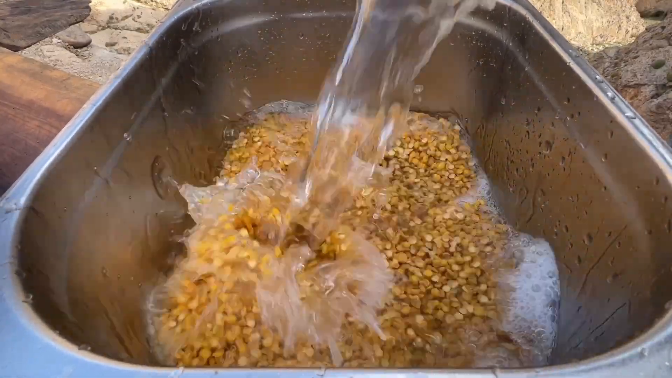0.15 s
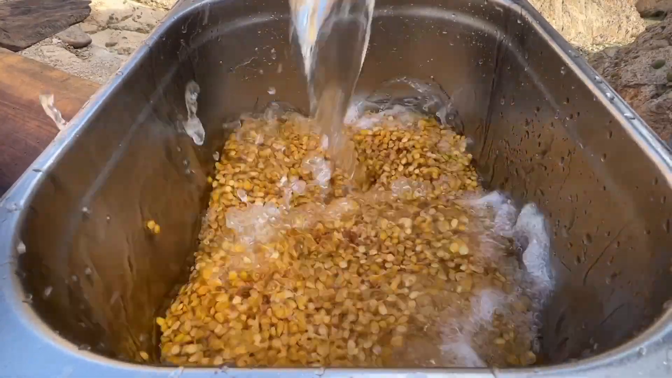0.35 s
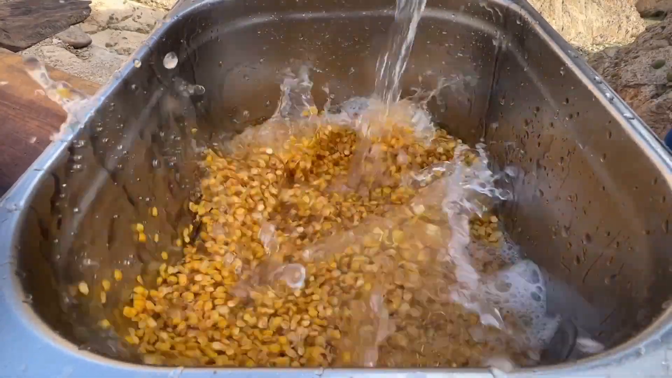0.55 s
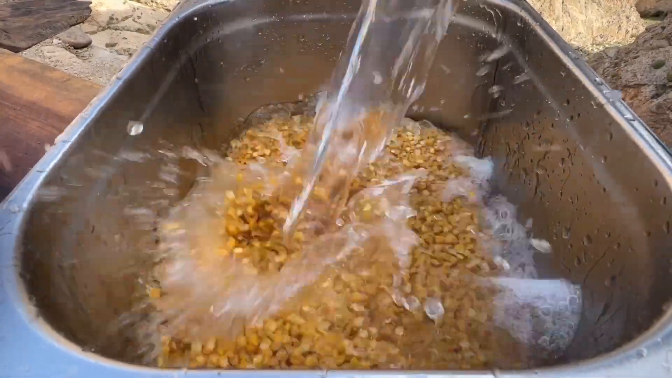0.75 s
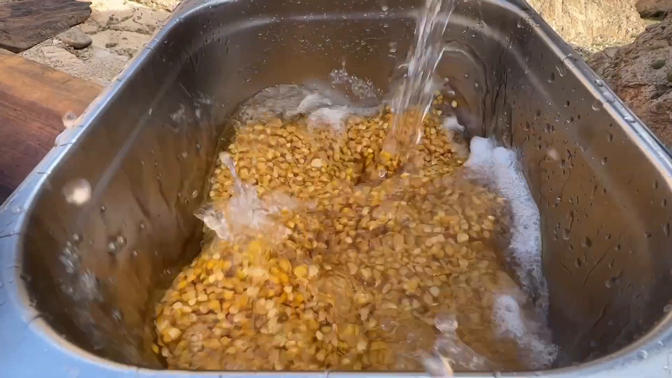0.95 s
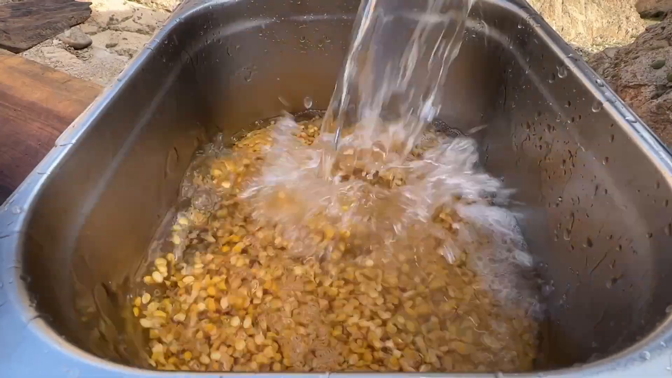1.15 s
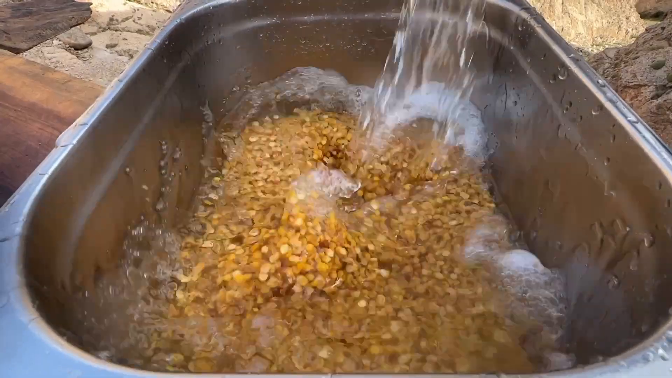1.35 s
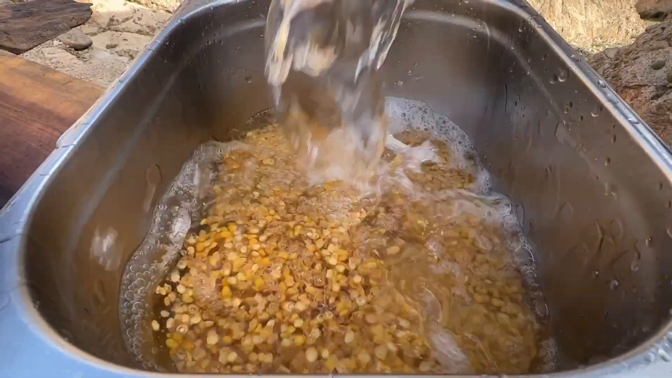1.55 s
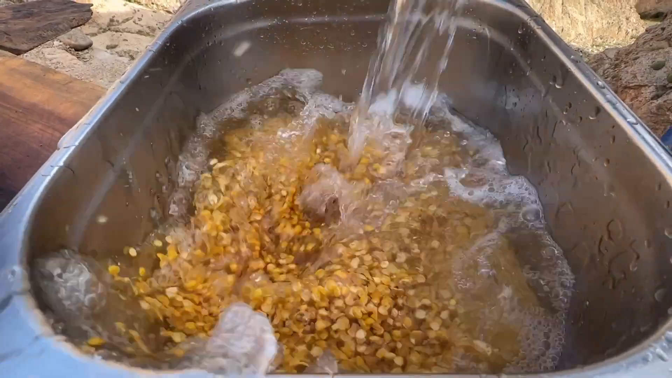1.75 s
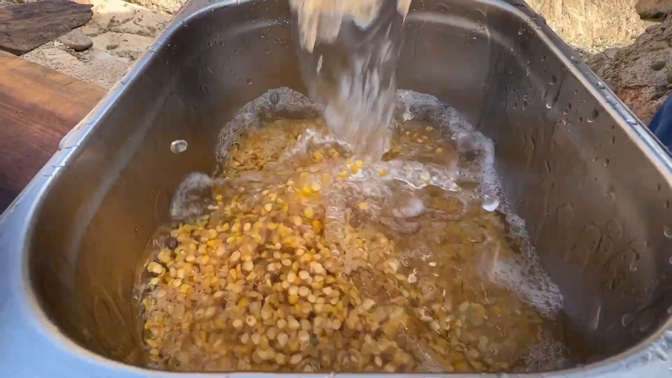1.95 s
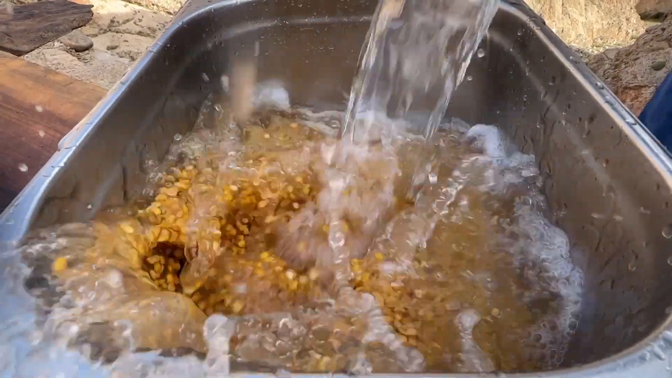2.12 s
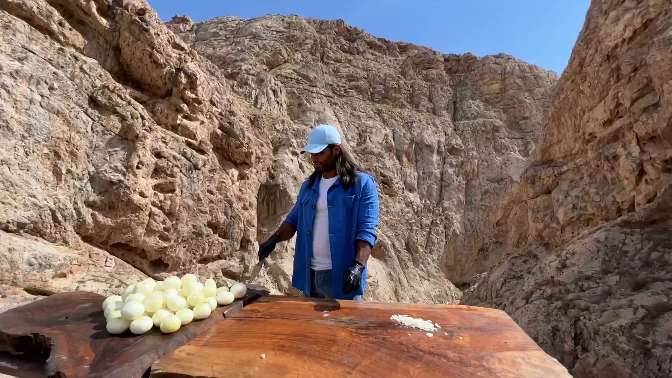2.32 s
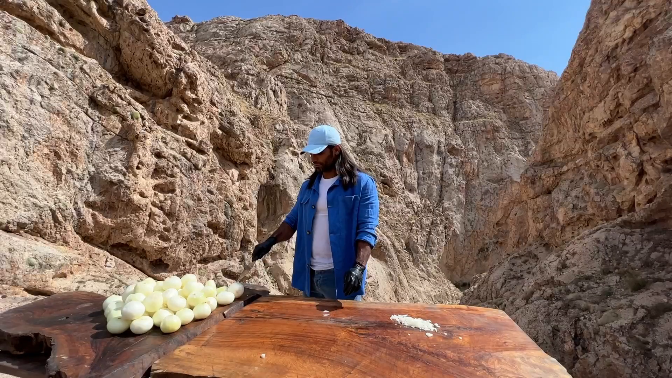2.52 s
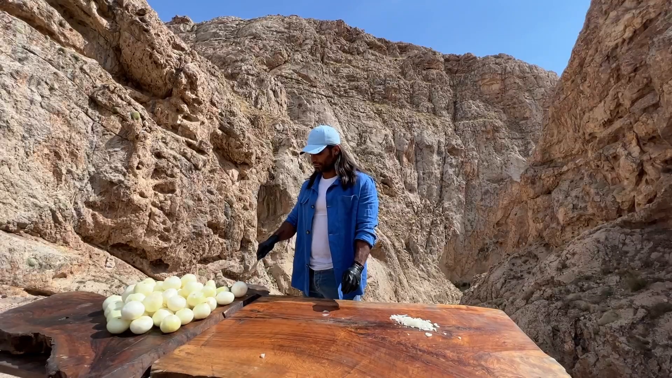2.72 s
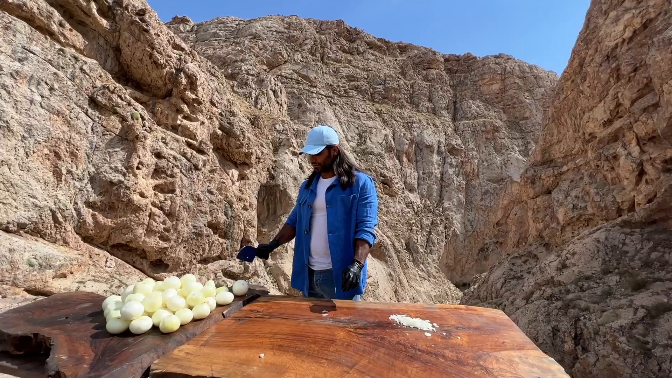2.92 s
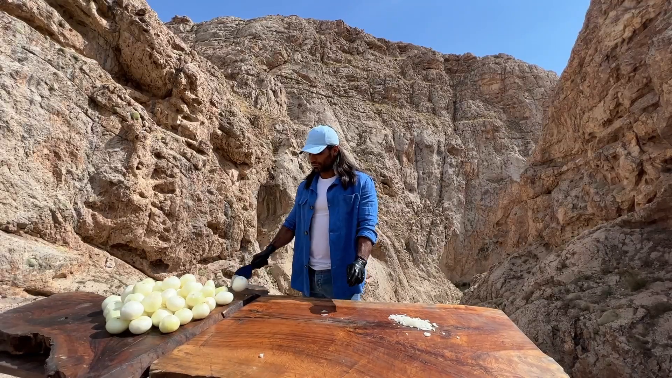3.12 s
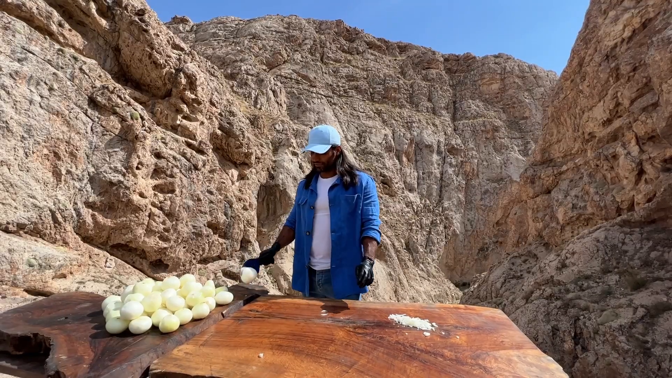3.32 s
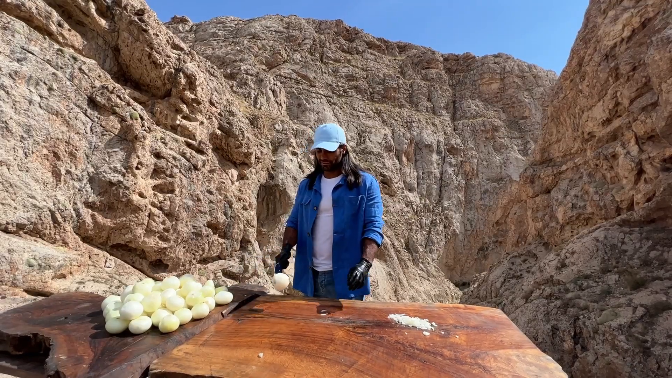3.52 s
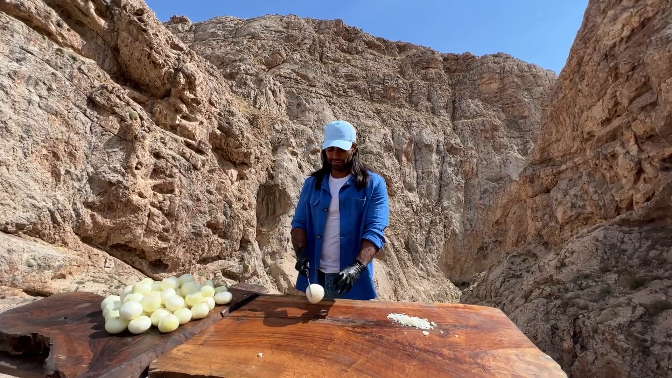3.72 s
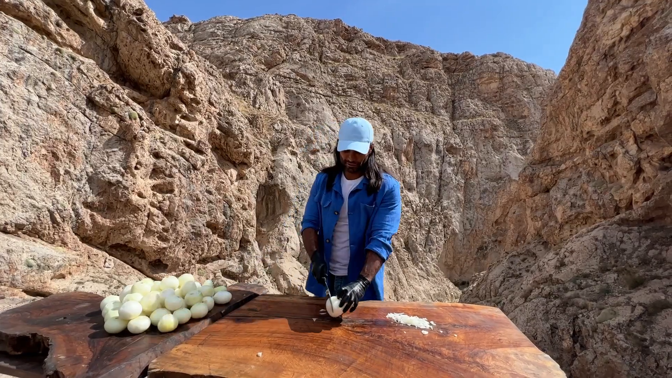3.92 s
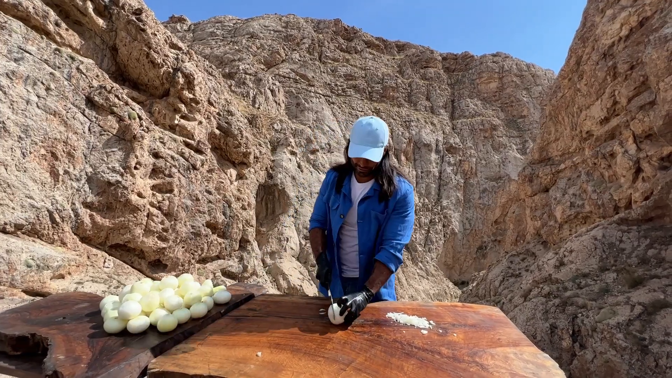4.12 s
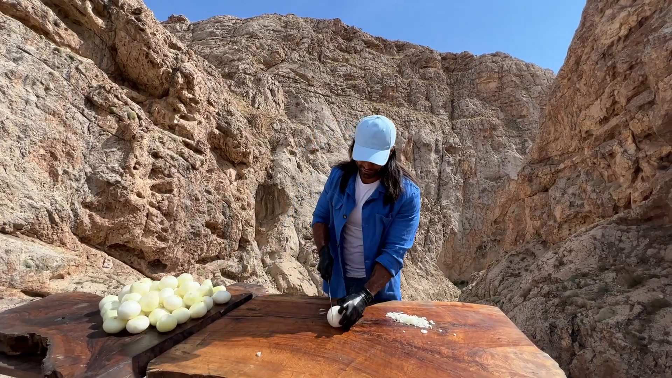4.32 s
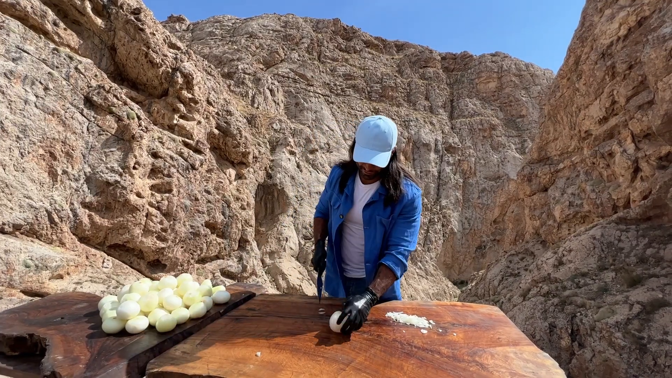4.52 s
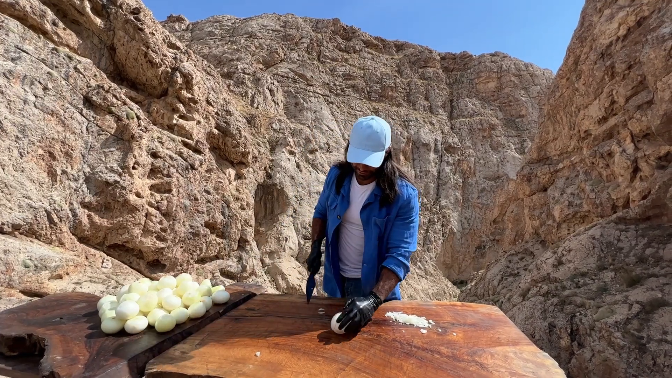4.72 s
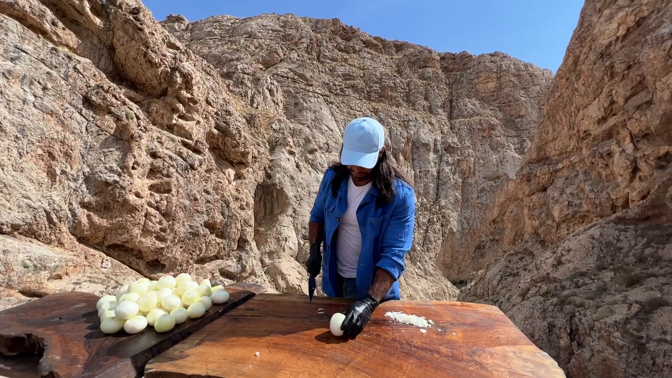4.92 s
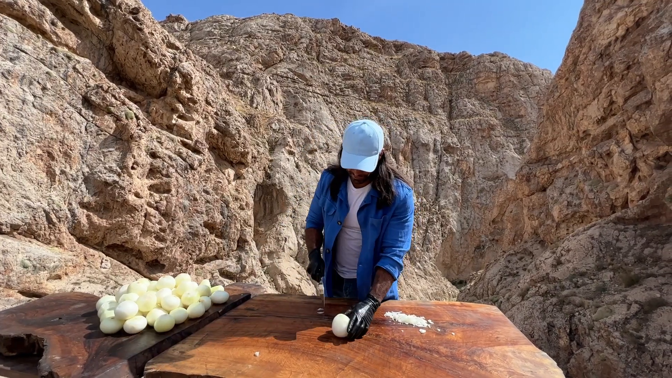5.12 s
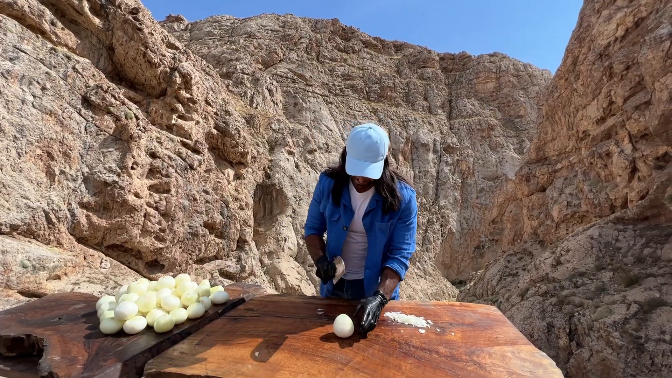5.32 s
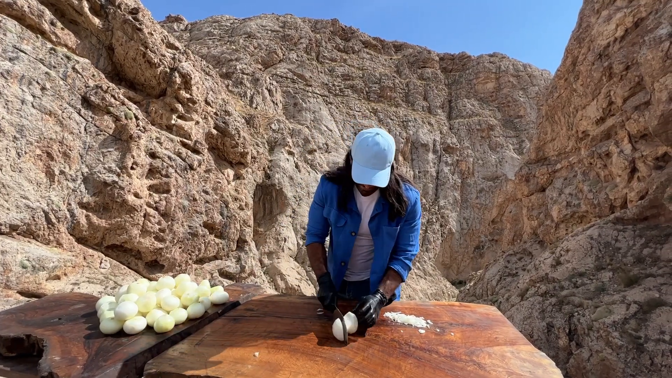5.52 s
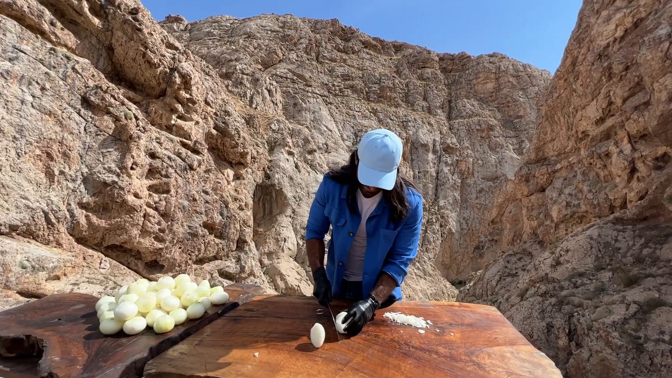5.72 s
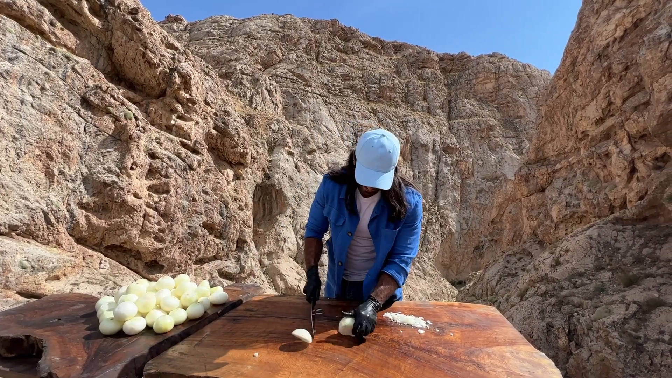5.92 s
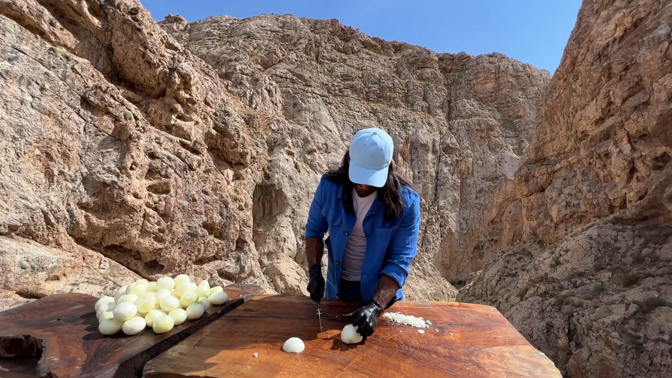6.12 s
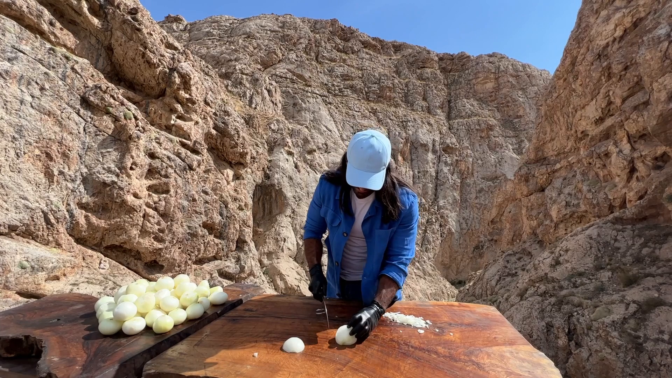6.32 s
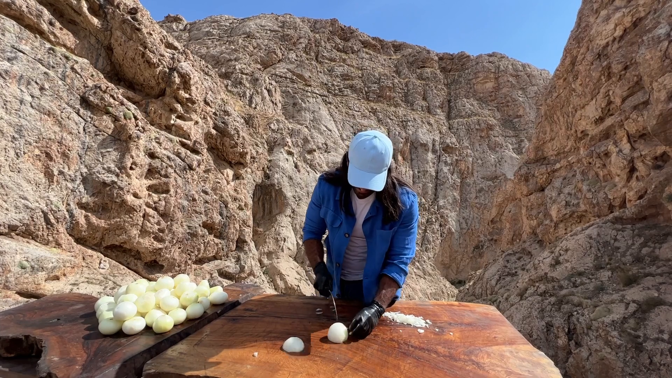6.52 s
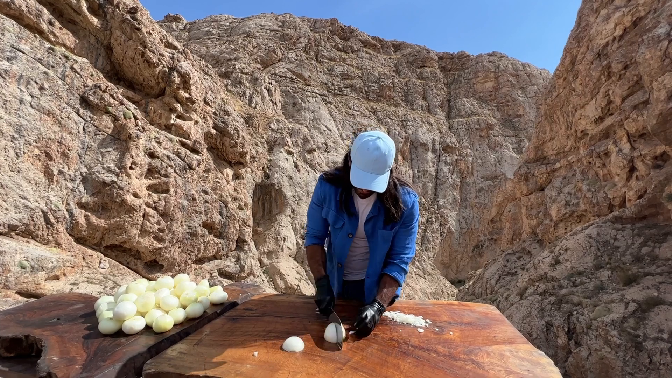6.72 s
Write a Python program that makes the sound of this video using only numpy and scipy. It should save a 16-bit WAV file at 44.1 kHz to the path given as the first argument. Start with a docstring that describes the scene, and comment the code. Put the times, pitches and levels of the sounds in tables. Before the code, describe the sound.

Water pours in splashing, gurgling surges over split peas in a steel pan, then cuts to a quiet gorge where a knife chops onions on wood.

```python
"""Close over a steel pan, then in a quiet rocky gorge: two places, one after the other. Water is poured in
surges over peas: gliding sines for large bubbles, ringing grains for bubbling and spray. In the gorge gloved
hands handle onions on a thick wooden board, with snaps, rustling and soft bumps. A knife crunches through two
onions and strikes the board's ringing modes; one scrape, a tumbling half. Behind lie far air with the answer of
the rocks, low puffs of rumble and a faint even ticking."""
import sys
import numpy as np
from scipy import signal
from scipy.io import wavfile

SR = 44100
rng = np.random.default_rng(int(sys.argv[2]) if len(sys.argv) > 2 else 0)


def put_to_file(sound):
    """Save the sound as 16-bit audio at rate SR, in the file named by the first command-line argument."""
    columns = np.atleast_2d(sound).T  # one column per channel
    safe = np.clip(columns, -1, 1)
    whole_steps = np.round(safe * 32767)
    wavfile.write(sys.argv[1], SR, whole_steps.astype(np.int16))


N = 302526
T = np.arange(N) / SR   # s

# Strength of the stream: t/s, spray level/dB, bubbling level/dB
FLOW = [(0.0, -34, -30), (0.02, -36, -31), (0.09, -38.5, -49.5), (0.2, -33, -32.5), (0.27, -32, -32),
        (0.38, -38.5, -41), (0.47, -31, -33.5), (0.58, -32, -32.5), (0.64, -37, -42.5), (0.76, -35.5, -39),
        (0.79, -29.5, -29.5), (0.865, -35, -31.5), (0.9, -30, -31.5), (1.11, -41, -42.5), (1.2, -41, -38),
        (1.28, -32.5, -29.5), (1.5, -37, -40), (1.62, -32, -34.5), (1.76, -31, -28.5), (1.88, -37.5, -34.5),
        (1.95, -37, -44.5), (2.055, -33, -40), (2.07, -33.5, -28.5), (2.2, -32.5, -28), (2.27, -33, -32)]
# Loudest large bubbles: t/s, level/dB, nominal pitch f/Hz
GLUGS = [(0.052, -36.5, 194.3), (0.058, -27.5, 467), (0.255, -10, 1400), (0.66, -22, 1580),
         (0.712, -32, 467), (1.049, -30.5, 143), (1.204, -23.5, 477), (1.442, -31, 324), (1.624, -13, 970),
         (0.145, -13.5, 910), (0.205, -11, 850), (0.329, -26, 458), (0.468, -14, 1070), (0.795, -11, 910),
         (0.881, -32, 203), (0.945, -9.5, 920), (0.984, -15, 830), (1.086, -25.5, 460), (1.175, -20, 665),
         (1.325, -31.5, 215), (1.37, -24, 516), (1.394, -20.5, 410), (1.535, -25.5, 396), (1.778, -20, 417),
         (1.81, -7, 1030), (1.906, -23, 278), (2.074, -14, 880), (2.15, -29.5, 307), (2.2, -21, 460),
         (2.249, -29, 266)]
# Loud slaps of water: t/s, level/dB, centre f/Hz
SLAPS = [(0.1186, -13, 5230), (0.3057, -11, 4840), (0.39, -17.5, 5530), (0.4289, -11, 4450),
         (0.5726, -14, 3280), (0.734, -26, 4840), (0.7716, -14, 3320), (1.142, -13.5, 4420),
         (1.3099, -10, 3620), (1.533, -15, 4130), (1.673, -18.5, 3780), (1.7491, -11, 3370),
         (1.9051, -9.5, 5740), (0.787, -14.5, 3500), (0.937, -15.5, 4800), (1.984, -17, 2500),
         (2.068, -12, 2300), (2.275, -12.5, 1600)]
# Stream thumping the bottom of the pan: t/s, peak level/dB
THUMPS = [(0.05, -42), (0.8, -41), (0.92, -35.5), (1.07, -41), (1.33, -44), (1.8, -44.5), (2.22, -49)]
# Colour of the bubbling: f/Hz, relative level/dB per Hz
BUBBLE_SPECTRUM = [(220, -19), (440, -8), (700, -5.5), (900, 9), (1190, -0.5), (1460, 8), (1750, -2),
                   (2100, 2), (2330, -2), (2520, 2), (2900, -5.5), (4000, -18.5)]
# Colour of the spray: f/Hz, relative level/dB per Hz
SPRAY_SPECTRUM = [(2300, -5), (4970, -3), (7770, -10.5)]
# Colour of the finest drops: f/Hz, relative level/dB per Hz
MIST_SPECTRUM = [(8200, -0.5), (11500, -3), (15700, -19)]
# Left-right likeness of the pan: f/Hz, correlation [-1 to 1]
PAN_LIKENESS = [(100, 0.55), (400, 0.53), (1300, 0.51), (1900, 0.53), (2500, 0.1), (9000, 0.1)]
# Left-right likeness of the finest drops: f/Hz, correlation [-1 to 1]
MIST_LIKENESS = [(8000, 0.62), (9500, .9)]
# Left over right at the pan: f/Hz, level difference/dB
PAN_BALANCE = [(60, 18), (180, -12), (550, 6.5), (1650, 2.5), (4970, 4), (15000, -6)]
POUR_END_S = 2.281
PAN_LAG_S = .00048   # the right side hears the pan later
MIST_DB, MIST_LAG_S = -5.5, -.000294   # against the spray; the right side hears the mist earlier
THUMP_LENGTH_S, THUMP_RISE_SHARE, THUMP_BED_DB = 0.13, 0.45, -62.5
SLAP_T60_S = 0.018
SMALL_SLAP_DB, SMALL_SLAP_SPREAD_DB = 7.0, 9.5   # against the spray
SMALL_GLUG_DB, SMALL_GLUG_SPREAD_DB = -5.0, 9.0   # against the bubbling
SMALL_GLUG_LOW_HZ, SMALL_GLUG_HIGH_HZ = 300, 1600
FILL_DB_PER_S = 2.5   # deeper water glugs louder

# Chops: blade meets onion t/s, crunch level/dB, blade meets wood t/s, blow level/dB,
# contact cut-off f/Hz, crack level/dB, strength of the last bounce against the first touch [ratio]
CHOPS = [(5.398, -35.5, 5.4205, -16, 2500, -12.5, 0.31), (6.676, -34.5, 6.6915, -16, 3060, -14, 0.59)]
# Modes of the board: f/Hz, level/dB under the first chop, level/dB under the second, longest t60/s
BOARD_MODES = [(158, -15, -12.5, 0.18), (236, -13, -19, 0.12), (308, -15, -12, 0.3),
               (401.8, -8, -10.5, 0.16), (451, -2, -21, 0.075), (537.3, -13.5, -11, 0.19),
               (657, -27, -10, .2), (837, -3, -2, 0.12), (1017, 2, 0.5, 0.07), (1140, -8, 3.5, 0.066),
               (1249, 8, 2, 0.04), (1510, 5.5, 4, .06), (1626, -7, -1, .07), (1710, -9, -6, .08),
               (1917, 1, -5, 0.024), (2900, -22.5, 2.5, .08)]
# Left over right at the board: f/Hz, level difference/dB
BOARD_BALANCE = [(60, -2.5), (130, -1.5), (290, -9), (640, -3), (1410, 7), (3100, 4.5), (6820, 3),
                 (15000, 1)]
# Colour of the cut onion: f/Hz, relative level/dB per Hz
CRUNCH_SPECTRUM = [(400, -7), (747, -23.5), (1940, 4.5), (3560, 1), (6750, -1), (12100, -46)]
# Colour of steel cracking on wood: f/Hz, relative level/dB per Hz
CRACK_SPECTRUM = [(2000, 26), (4850, -24.5), (6850, -25), (11300, -28), (13900, -51)]
# What dies away after a chop: f/Hz, level/dB per Hz, t60/s
AFTERSOUND = [(150, -3.5, 0.44), (396, -3, 0.21), (990, -4.5, 0.53), (1500, -5, .35), (2200, -8, 0.16),
              (4000, -15.5, 0.11), (9030, -34, 0.044)]
# Left-right likeness of crunch and crack, bright sounds from one point: f/Hz, correlation [-1 to 1]
BLADE_LIKENESS = ((1, .9), (2, .9))
# Resonances of the blade: f/Hz, width/Hz, level/dB per Hz
BLADE_MODES = [(1030, 38, 7.5), (2290, 25, 6), (3120, 150, -4.5), (4200, 81, -6), (5900, 64, -7),
               (7450, 140, -3), (8640, 480, -7.5), (9400, 42, -11), (11300, 100, -12)]
# Strokes of the blade over the wood: t/s, peak level/dB, length/s
STROKES = [(5.64, -60, 0.043), (5.74, -57, 0.07), (5.81, -48.5, 0.1)]
# Soft bumps on the board: t/s, peak level/dB, centre f/Hz
BUMPS = [(3.013, -44, 130), (3.781, -49, 413), (4.104, -53.5, 151), (4.381, -53, 350), (4.67, -54, 91),
         (5.186, -51.5, 166.3), (5.624, -42.5, 423), (5.986, -40, 436), (6.076, -30.5, 194),
         (6.15, -36, 238), (6.194, -29, 380), (6.239, -53, 395)]
BLADE_LAG_S, BOARD_LAG_S = -.00012, 0.00035   # right side against left: blade nearer the right, board later
LONGEST_RING = 65   # cycles: wood damps every mode within this many
LOW_MODES_LATE_S = .006   # the mass of the board moves after the surface
CRACK_T60_S, AFTERSOUND_LUMP_DB = .045, 1.5
STROKE_RISE_SHARE = 1.4
RUB_ON_BOARD = 0.72   # rubbing heard through the wood, ratio to the blade's ring

# Snaps of gloves and onion skin: t/s, level/dB, centre f/Hz
SNAPS = [(2.523, -50.5, 6430), (3.0089, -25, 5150), (3.666, -48, 3260), (3.7443, -38.5, 3020),
         (3.7835, -44.5, 2700), (3.768, -42, 1050), (3.0095, -45.5, 1000), (4.0203, -51, 1250),
         (4.112, -50.5, 2920), (4.2803, -48.5, 2450), (4.3102, -40, 2580), (4.376, -53, 4470),
         (4.735, -59, 4480), (5.458, -43, 2550), (5.631, -53, 4400), (5.65, -47, 5170), (5.974, -54, 6000),
         (5.9823, -40.5, 5000), (6.072, -44.5, 2890), (6.12, -52, 5540), (6.1475, -57, 4030),
         (6.195, -58, 5040), (6.348, -52, 5120)]
# Movements of the gloved hands: t/s, peak level/dB, length/s
MOVES = [(2.75, -72.5, 0.89), (3.03, -66.5, .3), (3.76, -62.5, 0.37), (3.785, -53, .035), (4.3, -58, .04),
         (4.31, -59.5, 0.22), (4.42, -69.5, 0.19), (4.82, -68.5, 0.5), (5.4, -64, 0.22), (5.72, -63, 0.46),
         (6.12, -71.5, 0.26), (6.69, -57, 0.11)]
# Colour of the rustling: f/Hz, relative level/dB per Hz
RUSTLE_SPECTRUM = [(600, -4.5), (1200, -0.5), (2500, -7.5), (4800, -1.5), (7000, -13.5), (11000, -28)]
SNAP_T60_S, SNAP_WIDTH = 0.048, 1.51   # width as a ratio either side of the centre
PUFF_RISE_S = .0012
MOVE_RISE_SHARE, STILL_DB = 0.46, -83.5

# Far air of the gorge: t/s, level/dB
AIR_LEVEL = [(2.35, -66.5), (2.52, -67.5), (2.62, -74.5), (2.9, -70.5), (3.23, -65), (6.84, -66)]
# Colour of the air: f/Hz, relative level/dB per Hz
AIR_SPECTRUM = [(150, -10), (352, 4.5), (505, -2), (577, -34), (876, 2), (1280, -5), (1870, 3.5),
                (2500, -8), (3250, -18.5), (5850, -17), (9760, -32)]
# Left-right likeness of air and rustling: f/Hz, correlation [-1 to 1]
AIR_LIKENESS = [(100, .3), (300, .6), (1000, 0.093), (4000, 0.1), (10000, 0.047)]
# Left over right for air and rustling: f/Hz, level difference/dB
AIR_BALANCE = [(60, 2.5), (150, 4.5), (380, -7), (950, 6), (2380, 2.5), (5980, 4), (15000, -10)]
# Low puffs of rumble: t/s, peak level/dB, length/s
RUMBLES = [(3.06, -56, 0.27), (4.1, -62, 0.43), (4.3, -64, 0.42), (4.67, -64, 0.4), (5.05, -69, 0.65),
           (5.28, -67.5, 0.28), (5.43, -56.5, 0.49), (5.97, -59.5, 0.24), (6.14, -49, 0.26),
           (6.46, -68, 0.35)]
# Faint even ticking: t/s, level/dB
TICKING = [(2.55, -75), (2.7, -55), (3.15, -46), (3.3, -54), (3.7, -60), (3.8, -90)]
GORGE_START_S = 2.28
ECHO_DB, ECHO_DELAY_S, ECHO_LENGTH_S, ECHO_RISE_SHARE = -41.5, 0.11, 0.5, .15   # level against the blow
RUMBLE_RISE_SHARE, RUMBLE_REST_DB = .3, -108
TICK_AT_S, TICKS_PER_S = 2.5686, 29.97   # one of the ticks falls here
TOP, CUTOFF_HZ = .93, 16800   # share of the recorder's range; upper limit


def pour():
    """Bubbles, spray, slaps and thumps of the stream at the pan, stopping short."""
    out = glugs() + bursts(SLAPS + small_slaps(count=130), SLAP_T60_S, width=1.53, pan_db=5.0)
    add(out, 0, stream(size=round(2.4 * SR)))
    # nearly cut off in 2 ms, a faint remnant for 12 ms, then silence
    cut_times = [POUR_END_S - .002, POUR_END_S, POUR_END_S + .012]
    fade_db = np.interp(T, cut_times, [1.0, -26, -17.43], right=-120)
    return late_right(out * amp(fade_db), PAN_LAG_S)


def stream(size):
    """Dense ringing grains follow the flow: bubbling, spray and mist over low thumps."""
    spray_db, bubbles_db = np.array(in_time(FLOW))[:, :size]
    bed = dict(likeness=PAN_LIKENESS, balance=PAN_BALANCE, count=44)
    bubbles = grains(size, BUBBLE_SPECTRUM, per_s=3200, cycles=43.0, spread_db=3.0, lump_db=1.5,
                     patch_db=2.0, **bed)
    spray = grains(size, SPRAY_SPECTRUM, per_s=16000, cycles=85.0, spread_db=4.5, lump_db=2.0,
                   patch_db=1.0, **bed)
    mist = grains(size, MIST_SPECTRUM, per_s=15000, cycles=64.0, spread_db=6.0, lump_db=2.0,
                  likeness=MIST_LIKENESS, count=12)
    # inverted on the right; pour() adds the pan's lag afterwards
    mist = late_right(mist * [[1], [-1]], MIST_LAG_S - PAN_LAG_S)
    thump_rows = [(s, db, THUMP_LENGTH_S) for s, db in THUMPS]
    thump_level = swells(thump_rows, THUMP_RISE_SHARE, THUMP_BED_DB)[:size]
    thumps = thump_level * lumpy_lows(size, high_hz=173, lump_db=2.5, pan_db=5.0)
    return amp(bubbles_db) * bubbles + amp(spray_db) * spray + amp(spray_db + MIST_DB) * mist + thumps


def glugs():
    """A large bubble rings a few cycles while its pitch climbs, each at a pace of its own."""
    out, t = np.zeros((2, N)), T[:round(SR / 10)]
    rows = GLUGS + small_glugs(count=260)
    paces = rng.uniform(.6, 1.5, (len(rows), 2))
    for (s, db, hz), (climb, loss) in zip(rows, paces):
        turns = hz * t
        tone = np.sin(2 * np.pi * turns * (0.956 + 0.018 * climb * turns))
        level = amp(db - 4.36 * loss * turns) * np.minimum(turns, 1)   # rises over one cycle
        add(out, s, tone * level * sides(at_hz(PAN_BALANCE, hz)))
    return out


def small_glugs(count):
    """Rows of time, level and pitch drawn by chance, louder when the water bubbles hard."""
    when, size, pitch = rng.random((count, 3)).T
    s, _, bubbles_db = np.transpose(FLOW)
    when = when * POUR_END_S
    level_db = np.interp(when, s, bubbles_db) + SMALL_GLUG_DB + SMALL_GLUG_SPREAD_DB * size
    level_db = level_db + FILL_DB_PER_S * when
    hz = SMALL_GLUG_LOW_HZ * (SMALL_GLUG_HIGH_HZ / SMALL_GLUG_LOW_HZ) ** pitch
    return list(zip(when, level_db, hz))


def small_slaps(count):
    """Drops hit water and steel by chance, harder when the stream is strong."""
    when, size, centre = rng.random((count, 3)).T
    s, spray_db, _ = np.transpose(FLOW)
    when = when * POUR_END_S
    level_db = np.interp(when, s, spray_db) + SMALL_SLAP_DB + SMALL_SLAP_SPREAD_DB * size
    return list(zip(when, level_db, 1200 * 5.7 ** centre))


def chops():
    """Cells burst under the blade, then steel meets wood: a crack, three bounces, the ringing board."""
    out, size = np.zeros((2, N)), round(.6 * SR)
    t, push = T[:size], np.zeros(size)
    touches = [round(s * SR) for s in (0, 0.00218, .0075, .0172)]
    grain = dict(spread_db=1.0, likeness=BLADE_LIKENESS, count=14)
    for spot, (enter_s, crunch_db, hit_s, blow_db, contact_hz, crack_db, bounce) in enumerate(CHOPS):
        cut = hit_s - enter_s
        # the crunch peaks as the blade gets through
        crunch_times = [0, .001, cut - .003, cut + .001, cut + 0.0061, .6]
        shape_db = np.interp(t, crunch_times, [-6.0, -1.0, 1.0, 15.0, -31.5, -120])
        crunch = grains(size, CRUNCH_SPECTRUM, per_s=17000, cycles=19.0, lump_db=0.1, **grain)
        add(out, enter_s, late_right(crunch, BLADE_LAG_S) * amp(crunch_db + shape_db))
        crack = grains(size, CRACK_SPECTRUM, per_s=6000, cycles=2.9, lump_db=-1.5, **grain)
        add(out, hit_s, late_right(crack, BLADE_LAG_S) * amp(crack_db - 60 * t / CRACK_T60_S))
        push[touches] = 1, .7, .4, bounce
        wood = board(soften(push, contact_hz), spot, LOW_MODES_LATE_S)
        add(out, hit_s, amp(blow_db) * (wood + amp(-1.5) * aftersound(size)))
    return signal.sosfilt(signal.butter(2, 105, "high", fs=SR, output="sos"), out)


def board(push, spot=0, late_s=0):
    """A push rings every mode of the board, neighbours in opposite phase."""
    late_push = np.roll(push, round(late_s * SR))
    out = 0
    for k, (hz, *db, t60) in enumerate(BOARD_MODES):
        tone = ring(push if hz > 600 else late_push, hz, min(t60, LONGEST_RING / hz))
        polarity = [[1], [(-1) ** (hz > 900)]]   # the upper modes reach the right side inverted
        out = out + amp(db[spot]) * (-1) ** k * tone * sides(at_hz(BOARD_BALANCE, hz)) * polarity
    return late_right(out, BOARD_LAG_S)


def aftersound(size):
    """Uneven noise in bands half an octave apart, each dying at its own pace."""
    t, out = T[:size], 0
    for hz in 130 * 2 ** np.arange(0, 6.5, .5):
        band = signal.butter(2, [hz / 2 ** 0.18, hz * 2 ** 0.2], "band", fs=SR, output="sos")
        noise = rng.standard_normal(size) + .5 * rng.standard_normal((2, size))
        level_db = at_hz(AFTERSOUND, hz) - 60 * t / at_hz(AFTERSOUND, hz, column=2)
        out = out + signal.sosfilt(band, noise) * amp(level_db)
    rise = np.minimum(t / 0.0082, 1)
    return late_right(out * amp(AFTERSOUND_LUMP_DB * drift(56, size)) * rise, BOARD_LAG_S)


def scrape():
    """Dense rubbing grains colour themselves in the resonances of the blade, each flickering."""
    start, size = round(5.5 * SR), round(.6 * SR)
    noise = rng.standard_normal(size) + 5.2 * rng.standard_normal((2, size))
    noise = noise * amp(5 * drift(300, size))   # the edge catches on the fibres
    blade = 0
    for hz, width, db in BLADE_MODES:
        flicker = amp(db + 2.1 * drift(25, size))
        blade = blade + flicker * np.sqrt(width) * rms_one(ring(noise, hz, 2.0 / width))
    hiss = rms_one(soften(np.diff(noise, prepend=0), 2600))
    wood = rms_one(board(soften(noise[0], 390)))
    rub = rms_one(rms_one(blade) + 0.47 * hiss + RUB_ON_BOARD * wood)
    level = swells(STROKES, STROKE_RISE_SHARE, rest_db=-120)[start:start + size]
    out = np.zeros((2, N))
    add(out, start / SR, rub * level * amp(1.4 * drift(90, size)))
    return out


def bumps():
    """Onions are soft and damp the wood: the low modes near the centre answer, briefly."""
    out, push = np.zeros((2, N)), np.zeros(round(.4 * SR))
    push[0] = 1
    for s, db, hz in BUMPS:
        soft_push = soften(ring(push, hz, 6.8 / hz), 430)
        bump = board(soft_push) * amp(-150 * T[:len(push)])
        add(out, s, amp(db) * bump / np.abs(bump).max())
    return out


def snaps():
    """Gloves and onion skin snap in short puffs of band noise."""
    return bursts(SNAPS, SNAP_T60_S, width=SNAP_WIDTH, pan_db=6.0)


def rustle(size):
    """Gloves crackle in sparse short grains that swell with each movement."""
    crackle = grains(size, RUSTLE_SPECTRUM, per_s=3000, cycles=14.0, spread_db=2.0, lump_db=1.5,
                     likeness=AIR_LIKENESS, balance=AIR_BALANCE, count=12)
    return crackle * swells(MOVES, MOVE_RISE_SHARE, STILL_DB)[-size:]


def gorge():
    """The background from the start of the gorge on: rustle, far air, low rumble and ticking."""
    start = round(GORGE_START_S * SR)
    size = N - start
    no_bass = signal.butter(4, 140, "high", fs=SR, output="sos")
    out = np.zeros((2, N))
    add(out, start / SR, signal.sosfilt(no_bass, rustle(size) + far_air(size)) + rumble(size))
    return out + ticking()


def far_air(size):
    """Very dense grains blur to smooth air, which swells as the rocks answer each chop."""
    echoes = [(hit_s + ECHO_DELAY_S, blow_db + ECHO_DB, ECHO_LENGTH_S) for _, _, hit_s, blow_db, *_ in CHOPS]
    level = swells(echoes, ECHO_RISE_SHARE, in_time(AIR_LEVEL)[0][::64])[-size:]
    return level * grains(size, AIR_SPECTRUM, per_s=110000, cycles=46.0, spread_db=2.0, lump_db=1.02,
                          patch_db=1.5, likeness=AIR_LIKENESS, balance=AIR_BALANCE, count=40)


def rumble(size):
    """Low rumble comes in lumpy puffs."""
    level = swells(RUMBLES, RUMBLE_RISE_SHARE, RUMBLE_REST_DB)[-size:]
    return level * lumpy_lows(size, high_hz=118, lump_db=5.0, pan_db=6.0)


def ticking():
    """Evenly spaced clicks with two short resonances, the same on both sides."""
    ticks = np.diff(np.floor((T - TICK_AT_S) * TICKS_PER_S), prepend=0) > 0
    high_pass = signal.butter(2, 600, "high", fs=SR, output="sos")
    ticks = signal.sosfilt(high_pass, ticks * amp(in_time(TICKING)[0]))
    return ring(ticks, 1400, .004) + .2 * ring(ticks, 4800, .003)


def grains(size, spectrum, per_s, cycles, spread_db, lump_db, likeness, balance=((1, 0), (2, 0)),
           count=36, patch_db=0):
    """Random clicks of uneven size dealt to resonators across the spectrum, partly shared by both sides; rms 1."""
    out, together = 0, drift(36, size) + drift(60, size)
    patches = [amp(patch_db * drift(24.0, size)) if patch_db else 1 for _ in range(6)]   # neighbours swell together
    excess = np.minimum(rng.exponential(1, (2, size)), 4)
    sizes = rng.choice([-1, 1], (2, size)) * amp(spread_db * excess)
    for k, hz in enumerate(np.geomspace(spectrum[0][0], spectrum[-1][0], count)):
        born = rng.random((2, size)) < per_s / count / SR
        clicks = born * np.roll(sizes, k, axis=1)
        shared, own = ring(clicks, hz, cycles / hz)
        alike = np.clip(at_hz(likeness, hz), -1, 1)
        pair = np.sqrt(1 + alike) * shared + np.sqrt(1 - alike) * own * [[1], [-1]]
        level = np.sqrt(hz) * amp(at_hz(spectrum, hz))   # the bands widen with frequency
        patch = patches[k * len(patches) // count]
        out = out + rms_one(pair) * patch * level * sides(at_hz(balance, hz))
    return rms_one(out * amp(lump_db * together))


def bursts(events, t60, width, pan_db):
    """Each a puff of noise around its centre that dies fast."""
    out, t = np.zeros((2, N)), T[:round(SR / 5)]
    for s, db, hz in events:
        noise = rng.standard_normal(len(t)) + 1.4 * rng.standard_normal((2, len(t)))
        band = signal.butter(3, [hz / width, min(hz * width, .45 * SR)], "band", fs=SR, output="sos")
        level = amp(db - 8.0 - 60 * t / t60)   # 8 dB left for the peaks of the noise
        add(out, s, rms_one(signal.sosfilt(band, noise)) * level * np.minimum(t / PUFF_RISE_S, 1))
    return out * sides(pan_db)


def lumpy_lows(size, high_hz, lump_db, pan_db):
    """Low noise in lumps, mostly its own on each side."""
    noise = rng.standard_normal((2, size)) + .5 * rng.standard_normal(size)
    lows = signal.sosfilt(signal.butter(2, [45, high_hz], "band", fs=SR, output="sos"), noise)
    return rms_one(lows * amp(lump_db * drift(14.0, size))) * sides(pan_db)


def swells(rows, rise_share, rest_db):
    """Gain in time: each swell climbs to its peak, then loses 20 dB over its length; powers add."""
    t = T[::64]
    power = amp(rest_db) ** 2
    for s, db, length in rows:
        away = np.maximum((t - s) / length, (s - t) / (length * rise_share))
        power = power + amp(db - 20 * away) ** 2
    return np.interp(T, t, np.sqrt(power))


def ring(x, hz, t60):
    """A unit click sets a decaying sine of height 1 ringing."""
    r, w = amp(-60 / (t60 * SR)), 2 * np.pi * min(hz, .45 * SR) / SR
    return signal.lfilter([0, np.sin(w)], [1, -2 * r * np.cos(w), r * r], x + 1e-18)


def soften(x, hz):
    """Two one-pole low-passes: a contact that takes time."""
    r = np.exp(-2 * np.pi * hz / SR)
    return signal.lfilter([(1 - r) ** 2], [1, -2 * r, r * r], x)


def drift(rate, size):
    """Slow chance of spread 1: noise low-passed at the rate in Hz, drawn at every tenth sample."""
    r = np.exp(-20 * np.pi * rate / SR)
    noise = rng.standard_normal(size // 10 + 4002)
    slow = signal.lfilter([1], [1, -2 * r, r * r], noise)[4000:]
    return np.interp(np.arange(size) / 10, np.arange(len(slow)), rms_one(slow - slow.mean()))


def late_right(x, lag_s):
    """The right channel delayed, read between samples."""
    i = np.arange(x.shape[1])
    return np.array([x[0], np.interp(i - lag_s * SR, i, x[1])])


def sides(db):
    """Left and right gains of a level difference."""
    return amp([[db / 2], [-db / 2]])


def add(out, s, sound):
    """Mixes a sound in from a moment on."""
    i = round(s * SR)
    out[:, i:i + sound.shape[-1]] += sound[..., :N - i]


def in_time(rows):
    """Columns of a table joined by straight lines over the whole time."""
    s, *columns = np.transpose(rows)
    return [np.interp(T, s, c) for c in columns]


def at_hz(points, hz, column=1):
    """A table read at a frequency, on a logarithmic axis."""
    points = np.array(points)
    return np.interp(np.log(hz), np.log(points[:, 0]), points[:, column])


def amp(db):
    """Gain of a level in dB."""
    return 10 ** (np.asarray(db) / 20)


def rms_one(x):
    """Scales a sound to rms 1."""
    return x / np.sqrt(np.mean(x ** 2) + 1e-20)


def scene():
    """The pan, then knife, hands and air in the gorge."""
    return pour() + chops() + scrape() + bumps() + snaps() + gorge()


def record(dry):
    """The deep bass is cut, peaks are rounded, the top is cut."""
    dry = signal.sosfilt(signal.butter(3, 55, "high", fs=SR, output="sos"), dry)
    rounded = TOP * np.tanh(dry / 0.75)
    return signal.sosfilt(signal.cheby2(12, 70, CUTOFF_HZ, fs=SR, output="sos"), rounded)


dry = scene()
out = record(dry)
put_to_file(out)
```